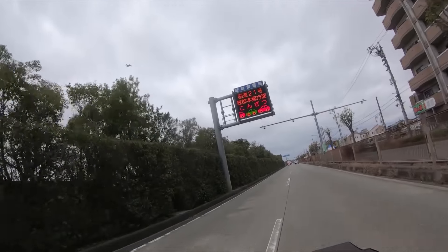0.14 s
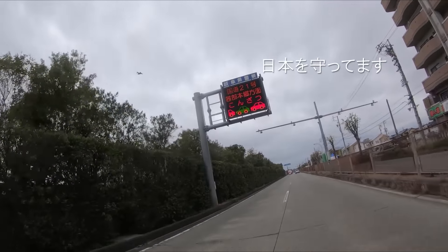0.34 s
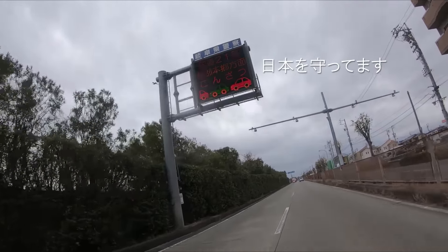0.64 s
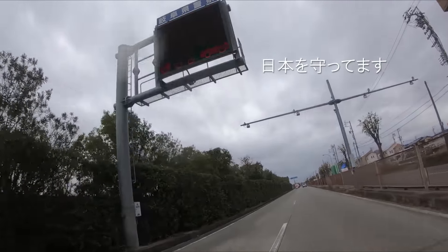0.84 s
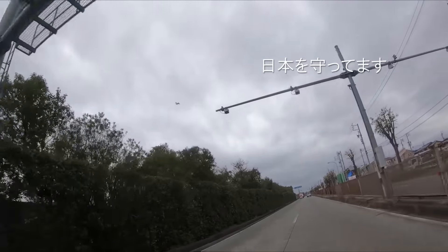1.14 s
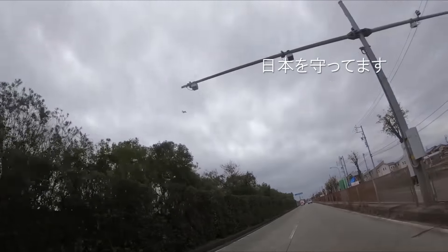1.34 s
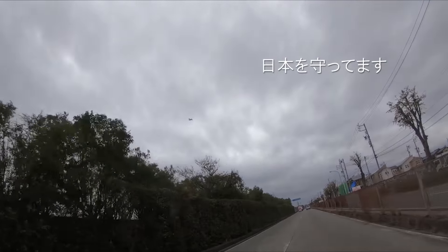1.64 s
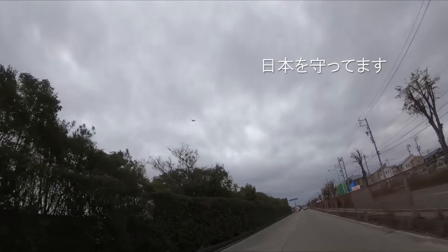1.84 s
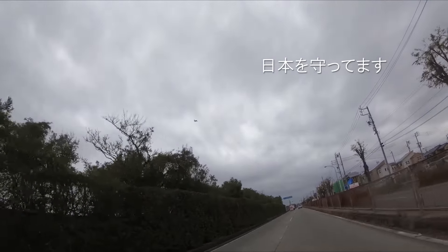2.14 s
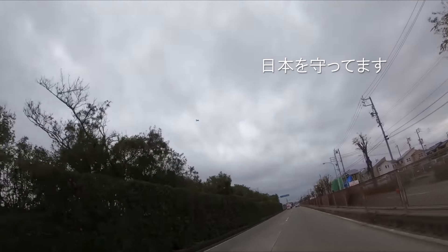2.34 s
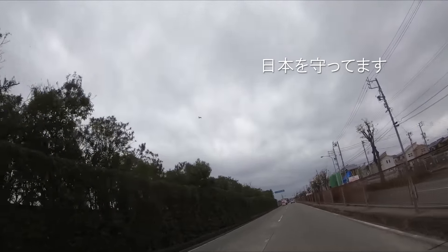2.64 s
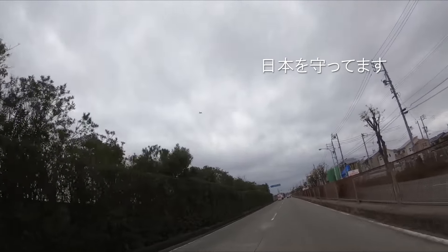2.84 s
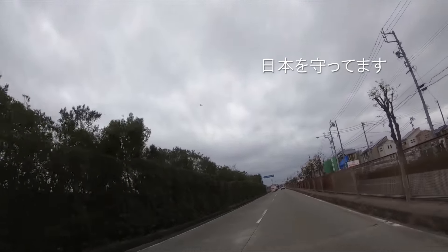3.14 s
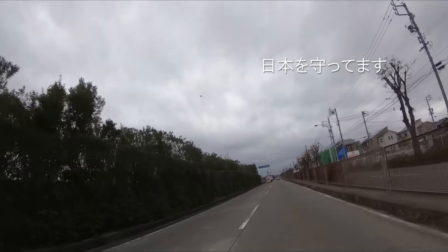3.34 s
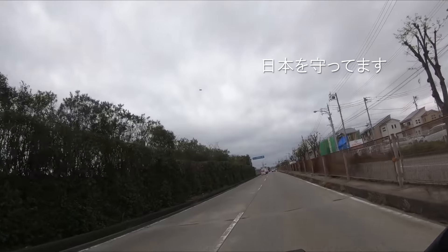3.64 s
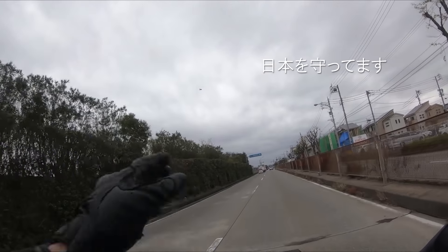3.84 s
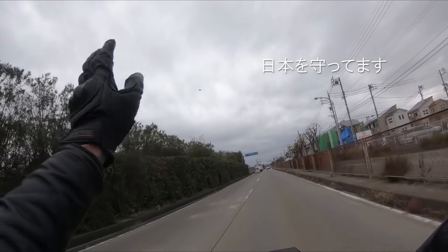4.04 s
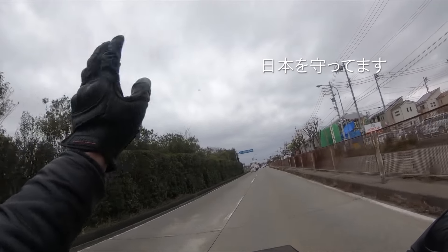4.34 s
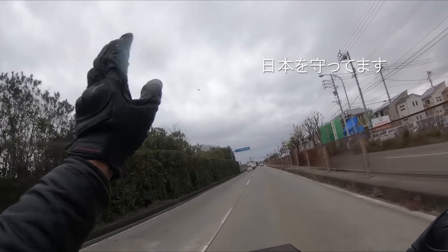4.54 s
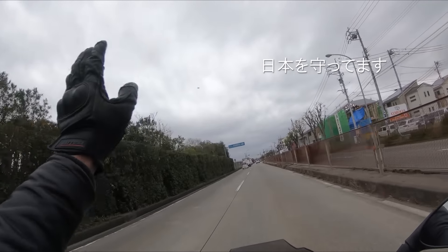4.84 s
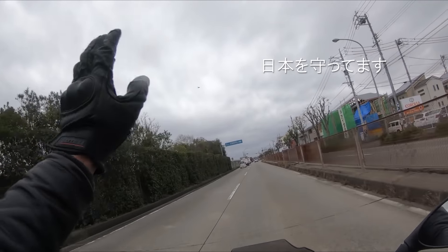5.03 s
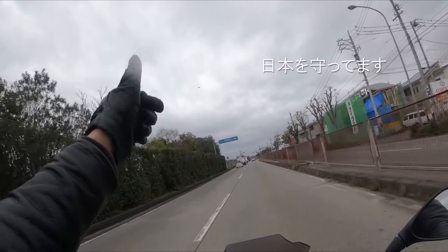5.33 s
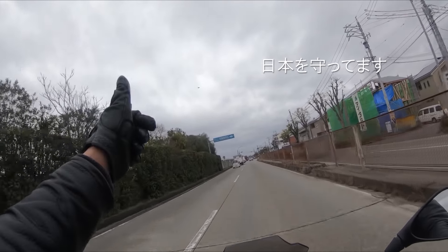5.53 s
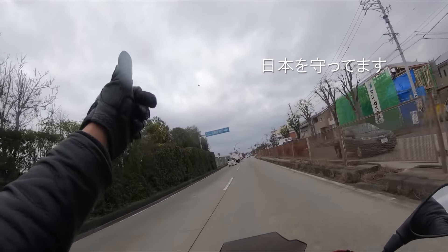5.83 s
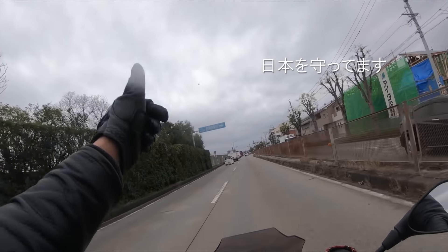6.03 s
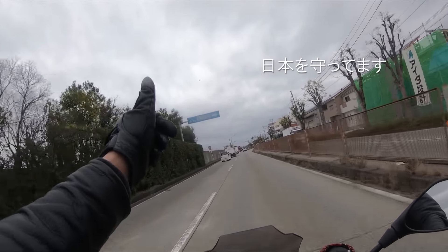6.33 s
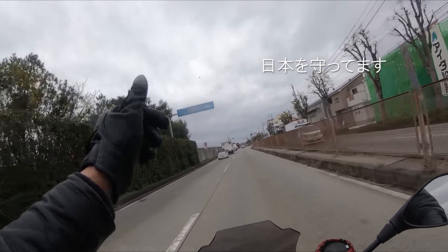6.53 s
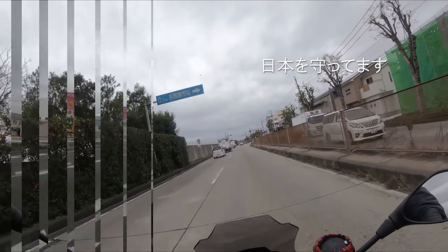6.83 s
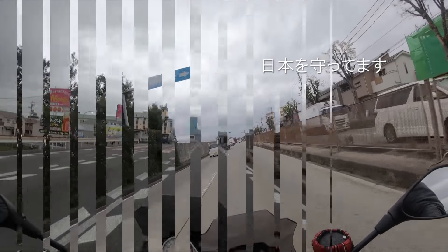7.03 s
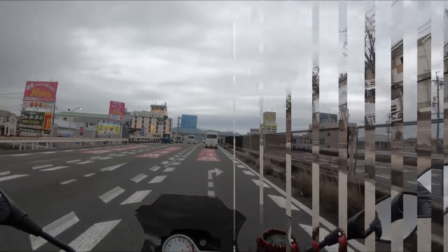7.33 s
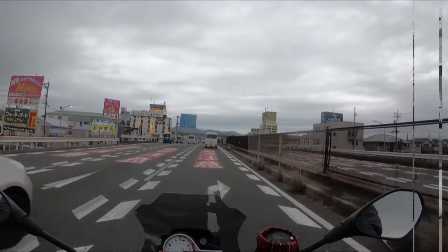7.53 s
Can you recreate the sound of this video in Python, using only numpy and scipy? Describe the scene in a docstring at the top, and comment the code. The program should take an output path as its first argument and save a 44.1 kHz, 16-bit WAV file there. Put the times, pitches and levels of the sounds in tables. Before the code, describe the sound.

A jet's broad, crackling roar recedes ahead of a droning motorcycle with wind buffeting, then cuts abruptly to plain road noise and engine.

```python
"""Jet receding ahead of a motorcycle

A jet's roar, four ranges of shaped noise with shock fronts, reaches a helmet microphone straight,
off the road, off the bike and off the rider's shoulder; the delayed copies comb it, and the road's
stripes glide up as the jet sinks. Engine orders, wind buffeting and slipstream hiss lie under it.
Near the end the sound cuts to a second road: no jet, steady road noise, the engine note changed.
"""
import sys
import numpy as np
from scipy import signal
from scipy.fft import rfft, irfft, next_fast_len
from scipy.io import wavfile
from scipy.ndimage import uniform_filter1d, minimum_filter1d, map_coordinates

SR = 44100
rng = np.random.default_rng(int(sys.argv[2]) if len(sys.argv) > 2 else 0)


def rack_gain(trim_db):
    """Turn a fader trim in dB into the linear factor to multiply a signal by."""
    fader = np.asarray(trim_db, float)
    return 10 ** (fader / 20)


def file_out(sig):
    """Save sig as 16-bit WAV at sys.argv[1]."""
    # one column per channel
    cols = np.atleast_2d(sig).T
    # limit, then scale
    lim = np.clip(cols, -1, 1)
    pcm = np.round(lim * 32767).astype(np.int16)
    wavfile.write(sys.argv[1], SR, pcm)


N = 338402
TIME_S = np.arange(N) / SR
CUT_S = 7.193   # second road starts
TOP_GROWTH_DB_PER_S = 2.5   # hiss top and self-noise


def rms_one(x):
    return x / np.sqrt(np.mean(x ** 2) + 1e-20)


def in_time(rows):
    """Columns of a table interpolated over its first column, time in s."""
    time_s, *columns = np.transpose(rows)
    return [np.interp(TIME_S, time_s, column) for column in columns]


def growth(db_per_s):
    """Gain rising steadily in dB, 1 at mid-length."""
    return rack_gain(db_per_s * (np.arange(N) - N / 2) / SR)


def drift(corner_hz):
    """Slow random wander of rms 1: coarse noise through a double one-pole low-pass."""
    pole = np.exp(-80 * np.pi * corner_hz / SR)   # runs at SR / 40
    noise = rng.standard_normal(N // 40 + 2002)
    slow = signal.lfilter([1], [1, -2 * pole, pole * pole], noise)[2000:]
    return np.interp(np.arange(N) / 40, np.arange(len(slow)), rms_one(slow))


def log_hz_grid(size):
    return np.log(np.maximum(np.arange(size // 2 + 1) * SR / size, 1))


def coloured(spectrum):
    """Steady noise of rms 1 with the given spectrum, 30 dB below its end values outside it."""
    size = next_fast_len(N)
    hz, db = np.transpose(spectrum)
    gain_db = np.interp(log_hz_grid(size), np.log(hz), db, left=db[0] - 30, right=db[-1] - 30)
    return rms_one(irfft(rfft(rng.standard_normal(size)) * rack_gain(gain_db), size)[:N])


def band(x, low_hz, high_hz):
    return signal.sosfilt(signal.butter(2, [low_hz, high_hz], "band", fs=SR, output="sos"), x)


def delayed(x, lag_s):
    """Copy of x at a fractional, possibly moving lag."""
    return map_coordinates(x, [np.arange(N) - lag_s * SR], order=3, mode="mirror")


# jet receding through gusty air: time_s, roar_db, haze_db (loss of the top range to the air)
JET_FLIGHT = [(0, -13, 1), (.45, -15, -2), (.9, -13.5, 1), (1.35, -11.5, 4), (1.7, -13, 4),
              (2.1, -10.5, 7.5), (2.55, -14.5, 8), (2.95, -12, 7), (3.5, -16.5, 6), (3.85, -16.5, 8),
              (4.3, -17.5, 6), (4.65, -13, 13.5), (5.1, -16, 6.5), (5.4, -19, 10), (5.75, -16, 12),
              (6.05, -11.5, 21.5), (6.6, -14, 18), (7.19, -10.5, 21)]
# exhaust spectrum: pitch_hz, density_db
JET_SPECTRUM = [(60, -11), (110, -11), (170, -2.5), (250, 0.5), (310, -2.5), (400, -4.5), (520, -1),
                (700, 4), (1100, 1.5), (1500, -3.5), (2200, -13), (2900, -17), (4000, -27), (6000, -47.5),
                (9000, -63.5)]
# centres of roar, growl, rasp, tearing: pitch_hz
RANGE_CENTRES = [270, 650, 1200, 2200]
# each range in clear air: level_db
RANGE_DB = [0, -6.5, -12, -14]
# part of the haze each range suffers: ratio
HAZE_SHARE = [0, .55, .7, 1]
# part of the roar's swell about its mean each range follows: ratio
SWELL_SHARE = [0.64, 0.71, 0.68, 0.66]
# growl range alone, thinner for a while: time_s, level_db
GROWL_TREND = [(0, 2), (1, -1.5), (1.5, -3.5), (2, -4), (2.6, -2.5), (3.1, -4), (5, 0.5), (7.19, 1.5)]
# brief swells of the upper two ranges: centre_s, peak_db
GUSTS = [(1.98, 2.9), (3.35, 2.2), (3.6, 4.5), (4.42, 2)]
# loudest shock fronts: time_s, peak_db (ahead of the band-passes)
SHOCK_FRONTS = [(0.874, -10), (1.388, -11), (1.7253, 0), (2.969, -5), (3.0164, -11)]


def jet(twinkle_db=0.89, own_db=0.38, crackle_per_s=120, crackle_db=1.0):
    """Exhaust turbulence in four overlapping ranges, flickered by gusts; shock fronts on top."""
    roar_mean_db, gust_width_s = -19.5, 0.06
    size = next_fast_len(N)
    exhaust = rfft(coloured(JET_SPECTRUM), size)
    log_hz = log_hz_grid(size)
    roar_db, haze_db = in_time(JET_FLIGHT)
    swell_db = roar_db - roar_mean_db
    levels_db = [roar_mean_db + db + swell * swell_db - haze * haze_db
                 for db, swell, haze in zip(RANGE_DB, SWELL_SHARE, HAZE_SHARE)]
    levels_db[1] = levels_db[1] + in_time(GROWL_TREND)[0]
    turbulence = 1.6 * np.tanh(drift(24) / 1.3)
    gusts_db = sum(db * np.exp(-((TIME_S - s) / gust_width_s) ** 2) for s, db in GUSTS)

    roar = 0
    for k, level_db in enumerate(levels_db):
        share = np.interp(log_hz, np.log(RANGE_CENTRES), np.eye(len(levels_db))[k])
        # turbulence flickers the upper two ranges together
        flicker_db = max(k - 1, 0) * twinkle_db * turbulence + (k > 1) * gusts_db
        flicker_db = flicker_db + own_db * drift(23)
        roar = roar + rack_gain(level_db + flicker_db) * rms_one(irfft(exhaust * share, size)[:N])

    strikes = rng.random(N) < crackle_per_s / SR
    excess_db = 2.1 * np.minimum(rng.exponential(1, N), 4)
    shocks = strikes * rack_gain(levels_db[-1] + crackle_db + excess_db)
    time_s, peak_db = np.transpose(SHOCK_FRONTS)
    shocks[(time_s * SR).astype(int)] = rack_gain(peak_db)
    shocks = shocks + 1e-18
    return roar + band(shocks, 1300, 3900) + rack_gain(-23.5) * band(shocks, 3600, 8500)


# extra path off the road, shrinking as the jet sinks: time_s, lag_ms
ROAD_LAG = [(0, 4.53), (.9, 4.46), (1.4, 4.33), (1.7, 4.17), (2.4, 3.99), (2.9, 3.8), (3.4, 3.65),
            (3.9, 3.48), (4.9, 3.25), (5.4, 3.09), (5.9, 3.02), (7.19, 2.96)]
# upper part of the bounce: time_s, level_db (capped at 0)
ROAD_TOP = [(0, -8.5), (.8, -13), (1.3, -2.5), (1.7, -9), (2.2, 0), (3.1, -0.5), (3.7, -10), (4.8, 2),
            (5.3, -11), (6, -7.5), (7.19, -15)]
# low part of the bounce: time_s, level_db (capped at 0), ahead_ms (of the upper part)
ROAD_LOW = [(0, -14, -0.055), (1, -14.5, 0.046), (1.8, -7, 0.028), (2.5, -4.5, 0.13), (3.2, -8, 0.02),
            (4, -1.5, -0.056), (5, -9.5, 0.048), (5.8, -5.5, -0.0097), (6.5, -6, -0.1), (7.19, -4.5, 0.12)]
# rim repeats, inverted then upright: level_db
RIM_DB = [-5.5, -1]


def road_echo(x):
    """Road bounce: lows bend round the rider; the dulled top rings at the helmet rim as the lag shivers."""
    split_hz, dull_hz, rim_ms = 1080, 2800, 0.16   # rim_ms: half a cycle
    lag_ms, = in_time(ROAD_LAG)
    top_db, = in_time(ROAD_TOP)
    low_db, ahead_ms = in_time(ROAD_LOW)
    lag_s = (lag_ms + .015 * drift(3) + .015 * drift(20)) / 1000   # head movement
    low = signal.filtfilt(*signal.butter(2, split_hz, fs=SR), x)
    dull = signal.filtfilt(*signal.butter(1, dull_hz, fs=SR), x - low)
    rung = dull
    for k, db in enumerate(RIM_DB, 1):
        rung = rung + (-1) ** k * rack_gain(db) * delayed(dull, k * rim_ms / 1000)
    top_bounce = rack_gain(np.minimum(top_db, 0)) * delayed(rung, lag_s)
    low_bounce = rack_gain(np.minimum(low_db, 0)) * delayed(low, lag_s - ahead_ms / 1000)
    return top_bounce + low_bounce


def scatter(x, level_db=-12.5, t60_s=0.15):
    """Diffuse smear off hedges and houses: a decaying noise tail that fills the deepest notches."""
    since_s = np.arange(SR // 4) / SR
    tail = rng.standard_normal(len(since_s)) * rack_gain(-60 * since_s / t60_s)
    return rack_gain(level_db) * signal.fftconvolve(x, tail / np.linalg.norm(tail))[:N]


# extra paths off the bike: time_s, near_lag_ms, far_lag_ms
BIKE_LAGS = [(.3, 1.8, 2.85), (1.15, 1.72, 2.58), (2.15, 1.52, 2.51), (2.7, 1.53, 2.5), (3.15, 1.34, 2.44),
             (3.45, 1.3, 2.3), (3.8, 1.02, 2.26), (4.9, 1.06, 2.19), (5.6, .92, 2.05), (7.19, .88, 2.0)]
# their strengths: time_s, near_db, far_db
BIKE_LEVELS = [(.8, -27, -28), (1.3, -16.5, -28), (2.101, -10, -24.5), (2.8, -14.5, -36), (3.2, -21, -26),
               (3.9, -20, -15.5), (4.5, -22, -35), (5, -21, -13), (5.8, -15, -15), (7.19, -15.5, -16.5)]


def bike_echo(x):
    """Two short bounces off the bike, about 0.9 to 2.9 ms late."""
    paths = zip(in_time(BIKE_LAGS), in_time(BIKE_LEVELS))
    return sum(rack_gain(np.minimum(db, 0)) * delayed(x, ms / 1000) for ms, db in paths)


# bounce off the shoulder: time_s, notch_hz, level_db
SHOULDER_PATH = [(0, 1380, -23), (.5, 1250, -7.5), (1.1, 1215, -6), (1.5, 1046, -8), (2.5, 975, -3.5),
                 (3.1, 1080, -6), (3.5, 1215, -5), (4.5, 1455, -6.5), (5.5, 1395, -4.5), (6.3, 1240, -6),
                 (7.19, 1270, -7)]


def shoulder_echo(x, cut_hz=4500):
    """Half a cycle late at the notch, so it cancels there and at three times it; cloth dulls the top."""
    notch_hz, level_db = in_time(SHOULDER_PATH)
    dull = signal.filtfilt(*signal.butter(1, cut_hz, fs=SR), x)
    return rack_gain(np.minimum(level_db, 0)) * delayed(dull, .5 / notch_hz)


# opening rush: centre_hz, width_hz, start_db, fade_db_per_s
SURGE_BANDS = [(717, 120, -35.5, 10), (860, 110, -28, 15.5), (1080, 260, -21, 31), (1284, 90, -27.5, 32.5)]


def surge():
    """Mid-range rush: four noise bands fading from the start, the upper ones faster."""
    white = rng.standard_normal(N)
    rush = 0
    for hz, width_hz, start_db, fade_db_per_s in SURGE_BANDS:
        tone = rms_one(band(white, hz - width_hz / 2, hz + width_hz / 2))
        rush = rush + rack_gain(start_db - fade_db_per_s * TIME_S) * tone
    return rush


# wind round the rider: time_s, level_db
BUFFET_LEVEL = [(0, -17.5), (.5, -25), (1, -19.5), (2.4, -22.5), (3.2, -20.5), (3.6, -18), (4, -22),
                (4.5, -20.5), (5.7, -26), (6.6, -22), (7.15, -29), (7.28, -15.5), (7.5, -17.5), (7.67, -19)]
# buffeting spectrum: pitch_hz, density_db
BUFFET_SPECTRUM = [(15, -4.5), (28, -3), (45, -3.5), (70, -2.5), (130, -4.5), (250, -21), (500, -37.5),
                   (900, -36.5)]


def buffeting(lumpy_db=2.5, deep_hz=45, deep_growth_db_per_s=1.4):
    """Wind on the microphone: lumpy low noise whose deepest part grows."""
    level_db, = in_time(BUFFET_LEVEL)
    buffet = rack_gain(level_db + lumpy_db * drift(2.9)) * coloured(BUFFET_SPECTRUM)
    deep = signal.sosfiltfilt(signal.butter(2, deep_hz, fs=SR, output="sos"), buffet)
    return buffet + deep * (growth(deep_growth_db_per_s) - 1)


# hiss past the helmet: time_s, level_db
SLIPSTREAM_LEVEL = [(0, -37.5), (.5, -38.5), (2.4, -39.5), (3, -36.5), (3.6, -39), (4.2, -39.5),
                    (7.19, -42.5)]
# hiss spectrum: pitch_hz, density_db
HISS_SPECTRUM = [(760, -22), (1300, 6), (1520, 1.5), (1900, 0.5), (2300, 2.5), (3150, -2.5), (4840, -8),
                 (8220, -22.5), (9380, -32.5), (12200, -58), (20600, -120)]
# singing helmet edges: centre_hz, width_hz, level_db
WHISTLES = [(3810, 83, -5.5), (4720, 280, -4), (6430, 150, -18.5), (8000, 120, -33)]


def slipstream(flicker_db=1.4, whistle_db=-17, whistle_growth_db_per_s=0.86, top_hz=6040):
    """Flickering hiss with a brightening top; helmet edges add narrow, growing bands of noise."""
    level_db, = in_time(SLIPSTREAM_LEVEL)
    white = rng.standard_normal(N)
    whistles = sum(rack_gain(db) * rms_one(band(white, hz - width_hz / 2, hz + width_hz / 2))
                   for hz, width_hz, db in WHISTLES)
    hiss = coloured(HISS_SPECTRUM)
    top = signal.sosfiltfilt(signal.butter(2, top_hz, "high", fs=SR, output="sos"), hiss)
    hiss = hiss + top * (growth(TOP_GROWTH_DB_PER_S) - 1)
    hiss = hiss + rack_gain(whistle_db + whistle_growth_db_per_s * TIME_S) * whistles
    return rack_gain(level_db + flicker_db * drift(20)) * hiss


# engine speed: time_s, firing_hz
FIRING_RATE = [(0, 90.8), (2.9, 90.9), (3.4, 92.2), (7.19, 92.2), (7.2, 95.4), (7.67, 95.6)]
# exhaust note: firing_multiple, first_road_db, second_road_db
ENGINE_ORDERS = [(.5, -14, -3), (1, 2, 3.5), (1.5, -17, -14), (2, -1.5, -0.5), (2.5, -6, -2.5),
                 (3, -0.5, 3), (3.5, -24, -20), (4, -16.5, -2), (4.5, -10, -32), (5, -11, -8),
                 (6.5, -21, -14), (7, -15, -10.5), (7.5, -14.5, -16), (8, -30.5, -22)]
# whole note on the first road, on the second: level_db
ENGINE_LEVEL = [-24, -27]


def engine(first_waver_db=0.37, second_waver_db=2.0, jitter=0.002):
    """Sine orders of a jittering firing rate, each wavering alone, more on the second road."""
    firing_hz, = in_time(FIRING_RATE)
    phase = 2 * np.pi * np.cumsum(firing_hz * (1 + jitter * drift(3.07))) / SR
    starts = rng.uniform(0, 2 * np.pi, len(ENGINE_ORDERS))
    first_road = np.arange(N) < CUT_S * SR
    waver_db = np.where(first_road, first_waver_db, second_waver_db)
    note = 0
    for (multiple, first_db, second_db), start in zip(ENGINE_ORDERS, starts):
        order_db = np.where(first_road, first_db, second_db) + waver_db * drift(7.9)
        note = note + rack_gain(order_db) * np.sin(multiple * phase + start)
    return np.sqrt(2) * rack_gain(np.where(first_road, *ENGINE_LEVEL)) * note


# roar gathered in narrow gliding bands: start_s, end_s, from_hz, to_hz, peak_db
GATHERINGS = [(1.7, 3.3, 245, 300, -14), (0.7, 2.4, 1760, 1980, -34), (2.8, 5.5, 720, 1000, -31),
              (1.0, 2.0, 440, 540, -22), (2.6, 4.3, 480, 610, -25), (0.4, 2.5, 700, 745, -30),
              (5.4, 6.5, 280, 320, -16.5), (5.7, 6.2, 360, 410, -22.5), (6.5, 7.4, 390, 420, -21.5),
              (5.5, 6.7, 670, 560, -27.5), (0.8, 2.4, 1600, 3000, -40.5), (2.4, 3.0, 1900, 1820, -38.5),
              (2.9, 3.8, 1630, 1760, -43.5), (4.4, 4.6, 2280, 2400, -43), (4.3, 5.9, 2060, 2600, -46.5),
              (4.4, 5.3, 2680, 2860, -50), (3.1, 3.9, 2300, 4000, -47.5)]


def gatherings(width_hz=57):
    """Narrow noise on gliding centres, each swelling and fading once."""
    out = 0
    low_pass = signal.butter(2, width_hz / 2, fs=SR)
    for start_s, end_s, from_hz, to_hz, peak_db in GATHERINGS:
        way = np.clip((TIME_S - start_s) / (end_s - start_s), 0, 1)
        phase = 2 * np.pi * np.cumsum(from_hz + (to_hz - from_hz) * way) / SR
        a, b = signal.lfilter(*low_pass, rng.standard_normal((2, N)))
        carried = rms_one(a * np.cos(phase) + b * np.sin(phase))
        out = out + rack_gain(peak_db) * np.sin(np.pi * way) * carried
    return out


# tyres, traffic and fuller slipstream of the second road: pitch_hz, density_db
SECOND_ROAD_SPECTRUM = [(70, -22), (130, -7), (200, -5.5), (330, -5), (560, -13), (800, -16.5), (1500, -21),
                        (2500, -24), (3500, -30), (5000, -33.5), (6500, -44), (8500, -50), (9500, -68)]


def second_road(level_db=-22, waver_db=0.6):
    """Tyres, traffic and slipstream as one slightly wavering coloured noise."""
    return rack_gain(level_db + waver_db * drift(15)) * coloured(SECOND_ROAD_SPECTRUM)


def scene():
    """Jet and its bounces with hiss, then the second road; wind and engine throughout."""
    after = np.clip((TIME_S - CUT_S) * 1000, 0, 1)   # 1 ms crossfade
    straight = jet()
    bounce = road_echo(straight)
    at_shoulder = straight + rack_gain(2) * bounce   # some road bounce too
    roar = straight + bounce + scatter(straight) + bike_echo(straight) + shoulder_echo(at_shoulder)
    roar = roar + surge() + gatherings()
    first = roar + slipstream()
    return ((1 - after) * first + after * second_road() + buffeting() + engine())[None]


def top_cut(x):
    """Nothing passes above the cut-off."""
    return signal.sosfilt(signal.butter(12, 15700, fs=SR, output="sos"), x)


def record(dry, knee_db=-13, squeeze=0.5, window_s=0.015, step=0.22, step_s=0.0034):
    """Fast gain control, peak limiter, 9 kHz low-pass, self-noise; a decaying step at the cut."""
    size = int(window_s * SR)
    level_db = 10 * np.log10(uniform_filter1d(dry ** 2, size) + 1e-9)
    gain_db = uniform_filter1d(-squeeze * np.maximum(level_db - knee_db, 0), size)
    held = dry * rack_gain(gain_db)
    room_left = np.minimum(.78 / (np.abs(held) + 1e-9), 1)
    held = held * uniform_filter1d(minimum_filter1d(room_left, size=241), size=241)
    out = signal.sosfilt(signal.butter(8, 9000, fs=SR, output="sos"), held)
    self_noise = rms_one(band(rng.standard_normal(N), 11000, 12500))
    out = out + rack_gain(-87) * growth(TOP_GROWTH_DB_PER_S) * self_noise
    since_s = TIME_S - CUT_S
    out = out - step * (since_s > 0) * np.exp(-np.maximum(since_s, 0) / step_s)
    out = out * np.minimum((N - np.arange(N)) / 100, 1)   # 100-sample fade-out
    return top_cut(out)


dry = scene()
out = record(dry)
file_out(out)
```